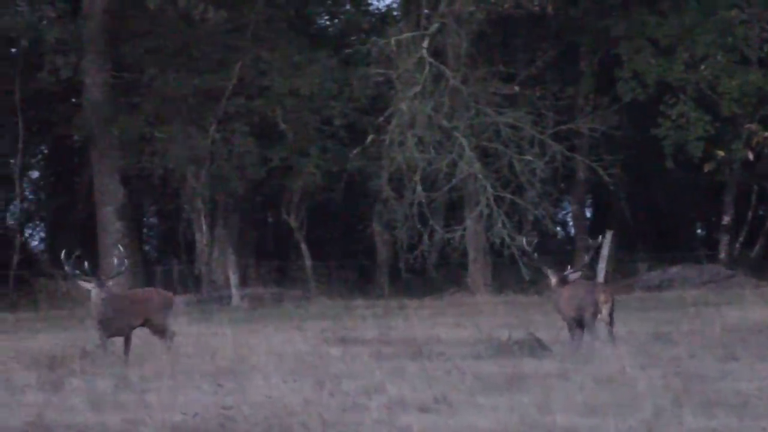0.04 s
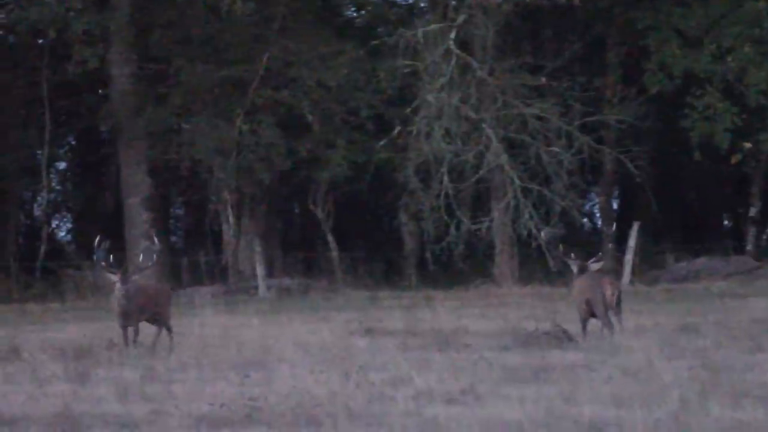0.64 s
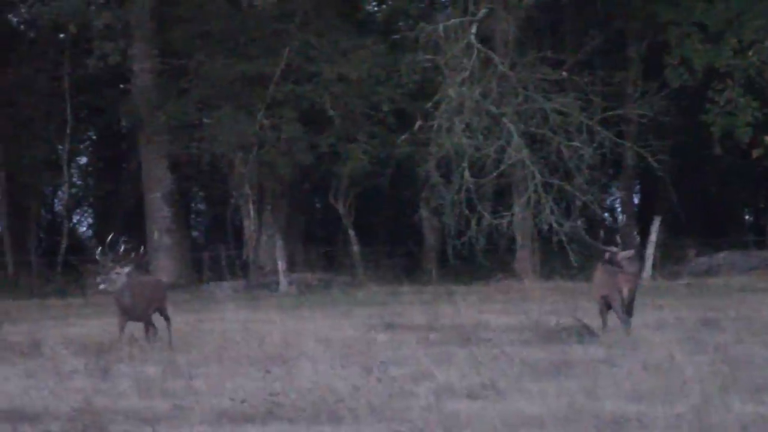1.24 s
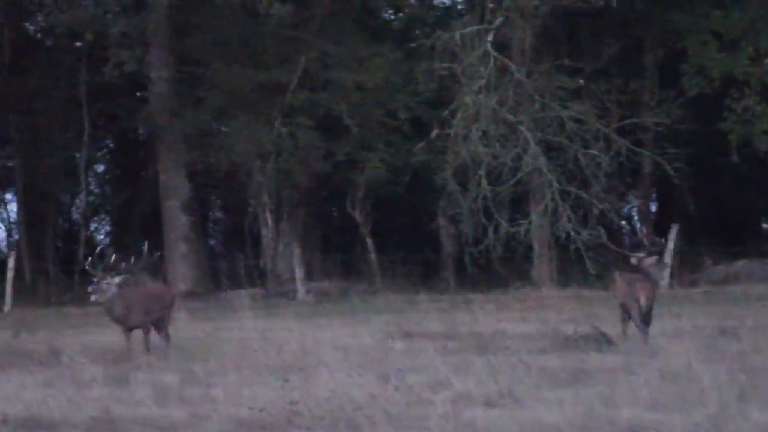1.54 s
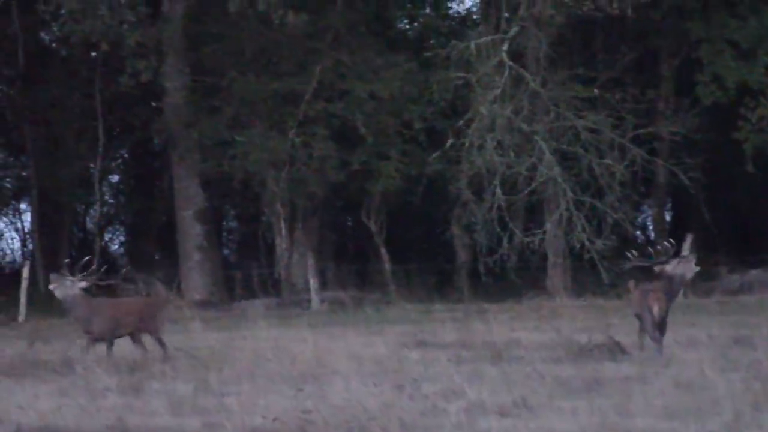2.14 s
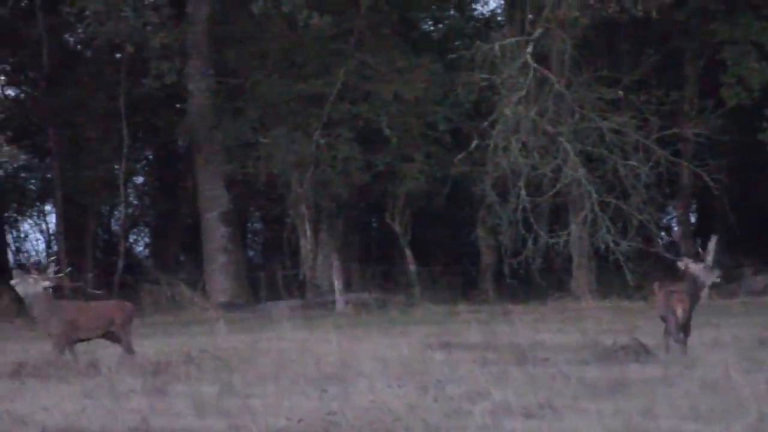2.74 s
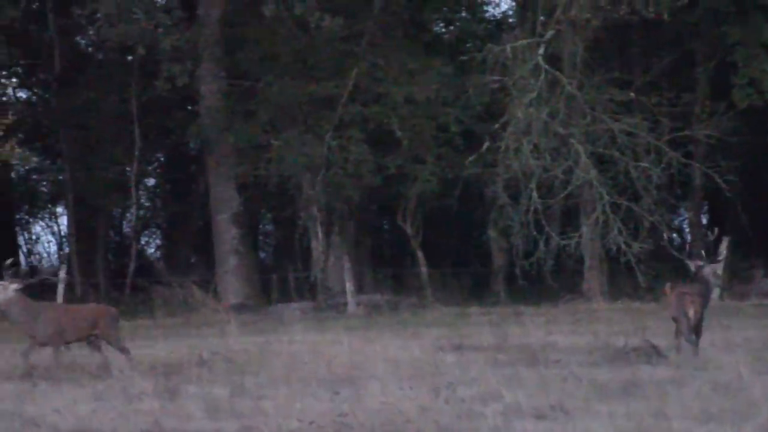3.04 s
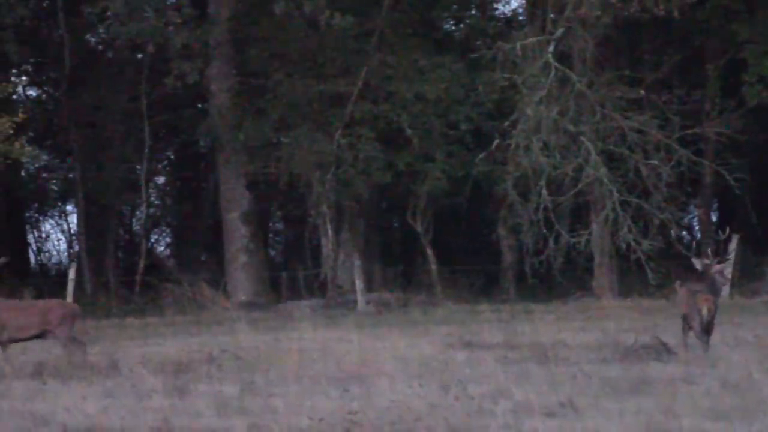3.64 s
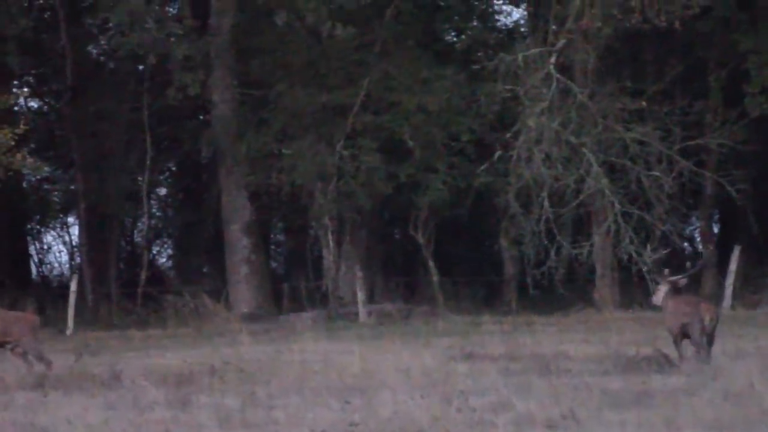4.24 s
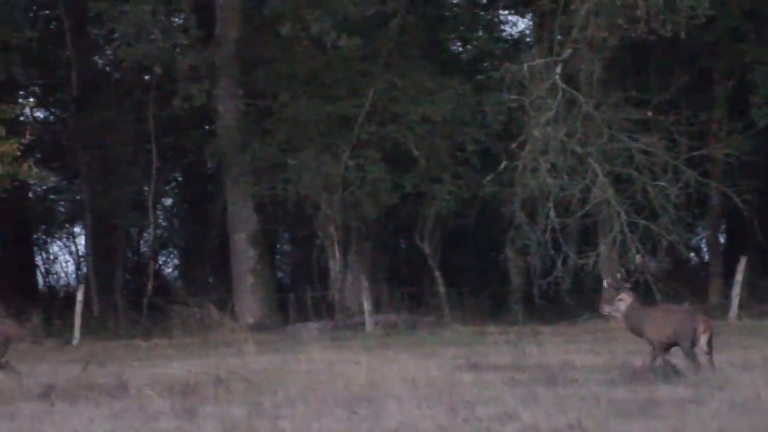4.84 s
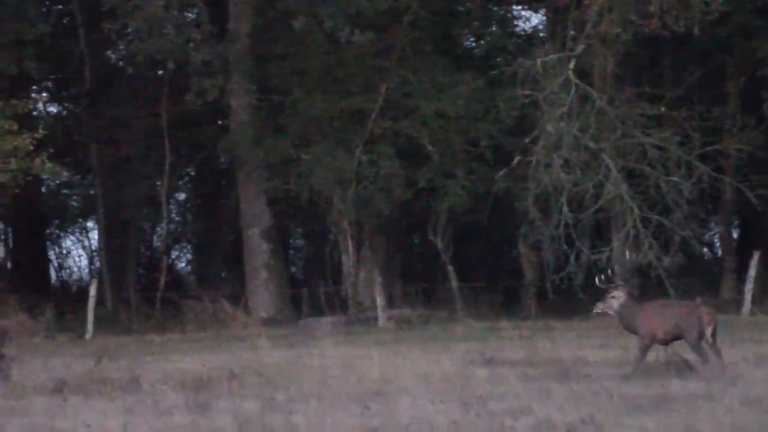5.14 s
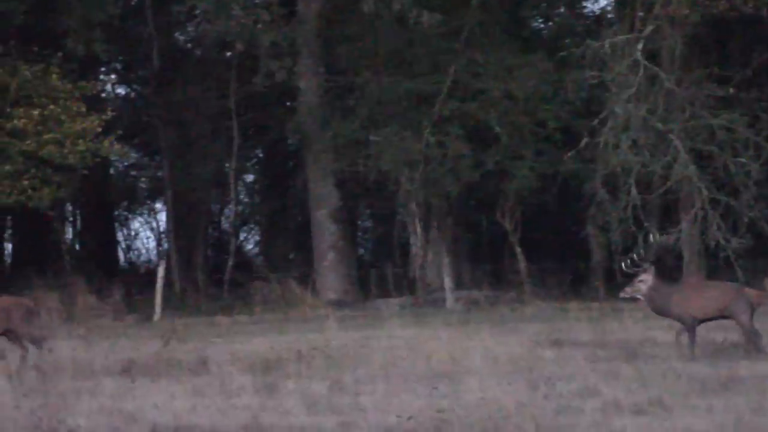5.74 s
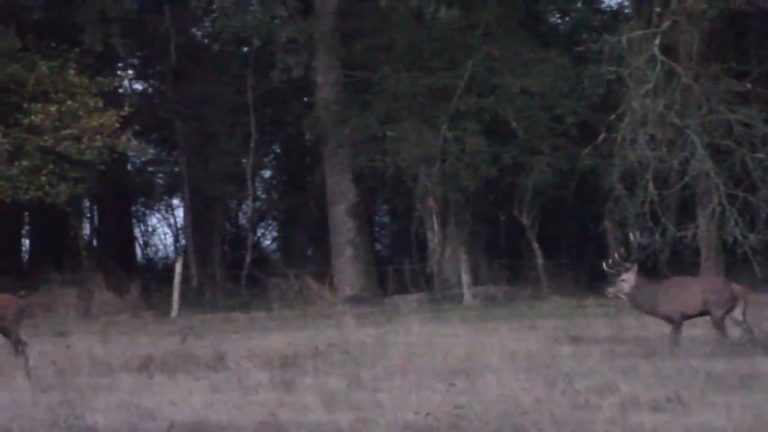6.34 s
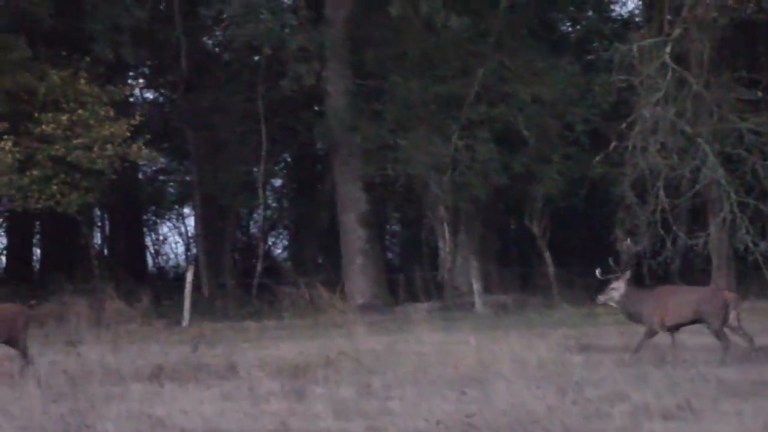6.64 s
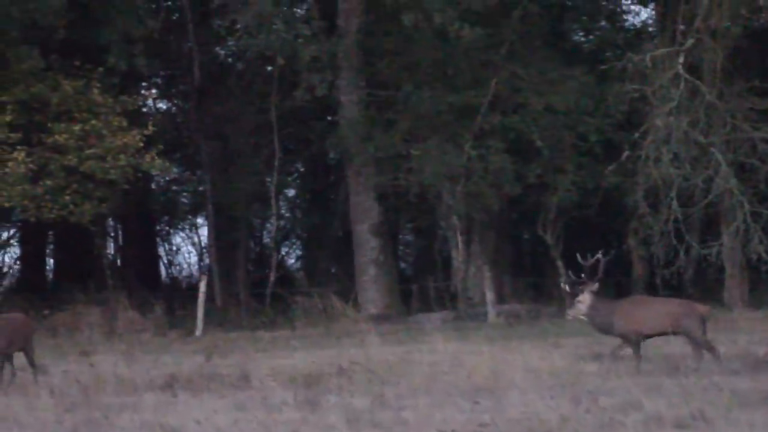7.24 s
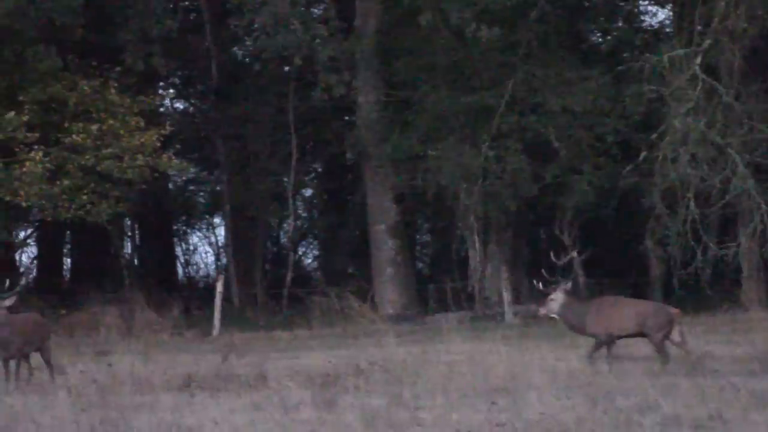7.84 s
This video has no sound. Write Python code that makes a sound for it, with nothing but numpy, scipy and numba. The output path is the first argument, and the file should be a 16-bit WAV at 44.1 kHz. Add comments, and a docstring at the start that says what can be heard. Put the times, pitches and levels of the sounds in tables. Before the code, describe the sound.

A red deer stag gives two harsh, low roars that ring through a forest clearing, while small birds whistle and twitter.

```python
"""A forest clearing at dusk. Over a hush, the faint tail of an earlier roar rings in the trees among
distant groans, and a small bird twitters. Nearer birds whistle, then a red deer stag roars twice: harsh,
irregular pulses through a throat whose resonances sink as the larynx is pulled down. The forest edge
rings long after him. Thin, high bird calls cross the second roar; as it dies away come sharp ticks,
more twittering and a few last distant groans."""
import sys
import numpy as np
from scipy import signal
from scipy.fft import rfft, irfft
from scipy.io import wavfile
from scipy.ndimage import uniform_filter1d
from numba import njit

SR = 44100
rng = np.random.default_rng(int(sys.argv[2]) if len(sys.argv) > 2 else 0)


def to_wav(sig):
    """Store sig (one row per channel, or 1-D mono) as 16-bit WAV at the path in sys.argv[1].

    Samples outside -1..1 are clipped; the rate is SR.
    """
    pcm = np.clip(np.atleast_2d(sig), -1, 1) * 32767
    pcm = np.round(pcm).astype(np.int16)
    wavfile.write(sys.argv[1], SR, pcm.T)  # frames by channels


N = 347508
TIME = np.arange(N) / SR


def from_db(db):
    """Decibels to gain."""
    return 10 ** (np.asarray(db) / 20)


def rms_one(x):
    """Scale to rms 1."""
    return x / np.sqrt(np.mean(x ** 2) + 1e-20)


def at_hz(points, hz):
    """Read a curve on a log-frequency axis."""
    knots_hz, values = np.array(points).T
    return np.interp(np.log(hz + 1), np.log(knots_hz), values)


def butter(x, hz, kind, order=2):
    """Butterworth filter."""
    return signal.sosfilt(signal.butter(order, hz, kind, fs=SR, output="sos"), x)


def drift(per_s, size):
    """Random wander with a spread of about 1."""
    knots = rng.standard_normal(4096)
    return np.interp(np.arange(size) / SR * per_s, np.arange(len(knots)), knots)


def pan(x, left_db):
    """Place a sound by how much louder it is on the left."""
    return x * from_db([[left_db / 2], [-left_db / 2]])


def stereo_noise(alike, size):
    """Two white noises with a given correlation."""
    mid, side = rng.standard_normal((2, size))
    return np.sqrt((1 + alike) / 2) * mid + np.sqrt((1 - alike) / 2) * side * [[1], [-1]]


def add(track, start, sound):
    """Mix a sound into a track at a time in seconds, trimming any overhang."""
    i = round(start * SR)
    part = sound[max(0, -i):max(0, N - i)]
    track[max(0, i):max(0, i) + len(part)] += part


def forest(x, trunks_db, tail_db, trunks_t60, alike):
    """Direct sound, quick scatter from nearby trunks and a long, uneven tail that loses treble first."""
    # How long the forest rings. Each row: frequency in Hz, seconds to fall by 60 dB.
    ring_times = [(300, 5.23), (500, 4.78), (760, 2.57), (1100, 3.14), (1400, 2.76), (1900, 2.03),
                  (3000, 1.51), (5000, 1.05), (8000, 1.22)]
    t = TIME[:3 * SR]
    edges_hz = 200 * 2 ** (np.arange(19) / 3)   # third octaves
    white, tail = stereo_noise(alike, len(t)), 0
    for low, high in zip(edges_hz, edges_hz[1:]):
        decay_db = 60 * t / at_hz(ring_times, np.sqrt(low * high))
        ripple_db = 2.0 * drift(12.12, len(t))
        tail = tail + butter(white, [low, high], "band") * from_db(ripple_db - decay_db)
    tail = tail * (1 - np.exp(-t / 0.0046))
    trunks = stereo_noise(alike, len(t)) * from_db(-60 * t / trunks_t60) * (t > .003)
    echo = (from_db(tail_db) * rms_one(tail) + from_db(trunks_db) * rms_one(trunks)) / np.sqrt(len(t))
    return x + signal.fftconvolve(x[None], echo, axes=1)[:, :N]


def hush():
    """The bed: far air in the trees and a thin, even hiss."""
    # Tone of the air. Each row: frequency in Hz, relative level in dB.
    spectrum = [(12, -61.5), (25, -15.5), (100, -5.5), (180, -3), (300, -4), (450, -2), (700, -9),
                (1150, -8), (1600, -11), (4300, -14.5), (15500, -16.5)]
    # Its width. Each row: frequency in Hz, left-right correlation.
    likeness = [(60, 0.3), (500, 0.34), (2000, 0.038), (8000, 0.013)]
    # Its lean. Each row: frequency in Hz, left over right in dB.
    balance = [(60, 1.5), (500, 2), (3000, -1), (12000, -.5)]
    hz = np.arange(N // 2 + 1) * SR / N
    mid, side = rfft(rng.standard_normal((2, N)))
    alike, sides = at_hz(likeness, hz), np.array([[1], [-1]])
    white = np.sqrt(1 + alike) * mid + np.sqrt(1 - alike) * side * sides
    colour = from_db(at_hz(spectrum, hz) + sides * at_hz(balance, hz) / 2)
    air = rms_one(irfft(colour * white, N))
    swell = from_db(2.0 * drift(13, N)) - 1   # the low air comes and goes
    return from_db(-52.5) * (air + swell * butter(air, 430, "low", order=1))


def vocal_folds(size, pitch_hz, jitter, shimmer_db, rasp):
    """Slack folds slap shut at uneven times and strengths; air rasps through at every opening."""
    cycles = np.cumsum(pitch_hz * np.exp(jitter * drift(90, size))) / SR
    slaps = np.diff(np.floor(cycles), prepend=0) * from_db(shimmer_db * drift(120, size))
    air = rng.standard_normal(size) * np.exp(-2.5 * (cycles % 1))
    return rms_one(slaps) + rasp * rms_one(air)


def murmur(per_s=7.4, length_s=0.66, low_hz=338, high_hz=685, level_db=-71):
    """Cues for faint groans at random times and resonances, dense enough to merge."""
    draws = rng.random((int(per_s * N / SR), 2))
    return [(when * N / SR, length_s, low_hz * (high_hz / low_hz) ** height, level_db)
            for when, height in draws]


def roar_tail_and_groans():
    """An earlier roar's faint tail among distant groans, to the left: each swell is one resonance."""
    # Each row: start in seconds, length in seconds, resonance in Hz, relative level in dB.
    # The opening rows above 1000 Hz are the roar's tail; the others are groans.
    swells = [(-.05, 0.31, 1330, -60), (0.197, 0.13, 343, -58.5), (0.349, 0.22, 620, -59),
              (0.498, 0.19, 1176, -57.5), (0.682, 0.28, 1095, -65), (0.899, 0.59, 630, -63),
              (1.756, 0.088, 503, -51.5), (1.959, 0.11, 459, -50), (7.15, 0.077, 430, -53),
              (7.33, 0.11, 487, -53), (7.523, 0.21, 467, -51)]
    half_width_hz = 64
    out = np.zeros(N)
    for start, length, hz, level_db in swells + murmur():
        size = int(length * SR)
        folds = vocal_folds(size, pitch_hz=121.2, jitter=0.25, shimmer_db=7, rasp=0.7)
        band = rms_one(butter(folds, [hz - half_width_hz, hz + half_width_hz], "band"))
        add(out, start, from_db(level_db) * np.hanning(size) * band)
    return pan(forest(out, trunks_db=-1.0, tail_db=-9.0, trunks_t60=0.12, alike=0.14), 9.2)


def syrinx(pitch, level_db, edge, waver, wavers_per_s=295):
    """A bird's unsteady, near-sine note along a pitch line; edge is the share spent fading."""
    size = len(pitch)
    phase = 2 * np.pi * np.cumsum(pitch * (1 + waver * drift(wavers_per_s, size))) / SR
    return np.sqrt(2) * from_db(level_db) * signal.windows.tukey(size, edge) * np.sin(phase)


def chirp(length, first_hz, last_hz, level_db):
    """A quick, buzzy, arched sweep; the other side of the syrinx adds a softer, lower note."""
    arch, buzz_depth, buzz_hz = 0.021, 0.036, 105.5
    size = int(length * SR)
    pitch = np.linspace(first_hz, last_hz, size) * (1 + arch * (1 - np.linspace(-1, 1, size) ** 2))
    buzz = 1 + buzz_depth * np.sin(2 * np.pi * (buzz_hz * TIME[:size] + rng.random()))
    upper = syrinx(pitch * buzz, level_db, edge=0.38, waver=0.021)
    lower = syrinx(pitch.mean() * .87 * buzz[::-1], level_db - 12.5, edge=0.3, waver=0.027)
    return upper + lower


def twitterer():
    """Two hurried phrases of chirps from the trees on the right."""
    # Each row: start in seconds, length in seconds, first and last pitch in Hz, relative level in dB.
    chirps = [(0.0, 0.013, 3060, 3670, -41), (0.05, 0.034, 3350, 4330, -40),
              (0.126, 0.017, 3610, 3770, -38.5), (0.173, 0.0085, 3370, 4380, -39),
              (0.183, 0.021, 3570, 3490, -41.5), (0.25, 0.026, 3530, 4330, -40),
              (0.316, 0.017, 3136, 3900, -39.5), (0.361, .016, 3890, 3490, -37.5),
              (0.376, 0.015, 3386, 4115, -36.5), (0.446, 0.021, 3480, 4070, -37.5),
              (0.509, 0.027, 3450, 3190, -43.5), (0.56, 0.035, 2990, 3700, -41.5),
              (0.643, 0.041, 3550, 3820, -41.5), (0.72, 0.026, 3090, 3360, -48),
              (0.765, 0.042, 3600, 3575, -49.5), (5.924, 0.01, 3840, 3920, -40.5),
              (5.943, 0.021, 3790, 3940, -39), (5.972, 0.027, 4010, 3640, -33),
              (6.016, 0.017, 3930, 3520, -41), (6.034, 0.029, 3750, 3660, -33.5),
              (6.07, 0.018, 3696, 3630, -37), (6.099, 0.0086, 3920, 3590, -33),
              (6.115, 0.014, 3780, 3420, -34.5), (6.13, 0.036, 3710, 3280, -41),
              (6.26, 0.039, 3625, 3780, -37.5), (6.374, 0.042, 3940, 3340, -39),
              (6.459, 0.027, 3700, 3700, -41), (6.537, 0.029, 3647, 3485, -43)]
    out = np.zeros(N)
    for start, *note in chirps:
        add(out, start, chirp(*note))
    in_trees = forest(out, trunks_db=-2.0, tail_db=-11.5, trunks_t60=0.59, alike=.37)
    return from_db(-2.03) * pan(in_trees, -5.5)


def whistles():
    """Pure songbird notes that swoop down onto a pitch, then slide while they swell or fade."""
    # Each row: start in seconds, length in seconds, first pitch in Hz, swoop time in seconds,
    # settled pitch in Hz, slide in Hz per second, relative level in dB, swell over the note in dB.
    notes = [(1.188, 0.08, 6140, 0.015, 5600, 1100, -23, 5),
             (1.384, 0.1086, 6450, 0.01, 6204, -2800, -18, 8.5),
             (1.625, 0.21, 7000, 0.017, 6150, -200, -20, 0), (1.855, 0.057, 6227, 0.019, 5870, 14, -21, 3),
             (1.99, 0.058, 7490, 0.0062, 5710, 89, -19.5, -3.5),
             (2.098, 0.11, 7640, 0.011, 4974, 1097, -16.5, 4.5)]
    out = np.zeros(N)
    for start, length, first_hz, swoop, settled_hz, slide, level_db, swell_db in notes:
        t = TIME[:int(length * SR)]
        pitch = settled_hz + (first_hz - settled_hz) * np.exp(-t / swoop) + slide * t
        pitch = pitch * (1 + 0.0076 * drift(55, len(t)))   # the held pitch strays a little
        add(out, start, syrinx(pitch, level_db + swell_db * (t / length - .5), edge=0.11, waver=0.0081))
    return out


def hoarse_notes():
    """Lower, rougher bird notes that glide down towards a pitch."""
    # Each row: start in seconds, length in seconds, first and target pitch in Hz,
    # glide time in seconds, relative level in dB, roughness as a share of the pitch.
    notes = [(1.213, 0.028, 6170, 4570, 0.018, -32, 0.042), (1.405, 0.026, 5500, 4420, 0.02, -45.5, 0.067),
             (2.286, 0.2, 3048, 2994, 0.02, -23.5, 0.015), (4.937, 0.037, 5440, 3856, 0.0088, -29, 0.02),
             (4.995, 0.044, 3380, 2990, 0.021, -37.5, 0.018), (5.11, 0.073, 3875, 3750, 0.044, -39, 0.013),
             (5.17, 0.091, 3470, 3200, 0.043, -35, 0.022), (6.477, 0.0038, 3100, 1730, 0.0018, -36.5, .015)]
    out = np.zeros(N)
    for start, length, first_hz, target_hz, glide, level_db, rough in notes:
        t = TIME[:int(length * SR)]
        pitch = target_hz + (first_hz - target_hz) * np.exp(-t / glide)
        add(out, start, syrinx(pitch, level_db, edge=0.086, waver=rough, wavers_per_s=600))
    return out


def near_birds():
    """Whistles, hoarse notes, thin calls and ticks from the trees on the left."""
    song = forest(whistles(), trunks_db=-3.0, tail_db=-22.5, trunks_t60=0.6, alike=0.46)
    contact = forest(ticks(), trunks_db=-0.5, tail_db=-19.0, trunks_t60=0.38, alike=0.32)
    calls = hoarse_notes() + thin_calls()
    deeper = forest(calls, trunks_db=0.5, tail_db=-18.5, trunks_t60=0.64, alike=0.1)
    return pan(from_db(-6.0) * song + contact, 4.5) + from_db(-5.5) * pan(deeper, 5.0)


def roar_gesture(pull, hold, tiring, full_db, resting, abruptness, flare_db):
    """Pull, hold, tire, let go: one roar's effort, throat shortness, brightness and tiredness (0-1)."""
    swell_db, sag_db, release_db_per_s = 21, 6.5, 175
    flare_at, flare_width = 0.49, 0.36   # shares of the pull
    end = pull + hold + tiring
    t = TIME[:int((end + 40 / release_db_per_s) * SR)]
    to_go = np.maximum(1 - t / pull, 0)   # the larynx drops fast, then eases onto its stop
    tired = np.clip((t - pull - hold) / tiring, 0, 1)
    creep = 0.028 * (pull + hold - t)   # the throat keeps stretching a little
    wobble = (0.0072 + 0.035 * tired ** 2) * drift(7.98, len(t))   # and shakes more as he tires
    shortness = 1 + (resting - 1) * to_go ** 1.64 + creep + wobble
    release_db = release_db_per_s * np.maximum(t - end, 0)
    effort_db = full_db - swell_db * to_go ** abruptness - sag_db * tired - release_db
    bright_db = flare_db * np.exp(-((t / pull - flare_at) / flare_width) ** 2)
    return effort_db, shortness, bright_db, tired


@njit
def resonance(x, hz, width):
    """A resonance with moving centre and width, and a peak gain of about 1."""
    out, state = np.zeros(len(x)), 0j
    for i in range(len(x)):
        decay = np.exp(-np.pi * width[i] / SR)
        state = state * decay * np.exp(2j * np.pi * hz[i] / SR) + x[i]
        out[i] = 2 * (1 - decay) * state.real
    return out


def roar(effort_db, shortness, bright_db, tired, rasp_db):
    """The stag lowers his larynx while he calls: the throat lengthens and its resonances slide down."""
    # Resonances of the stretched throat. Each row: centre in Hz, width in Hz, relative level in dB,
    # how strongly it follows the larynx, how strongly it takes up the brightness.
    throat = [(399, 21.5, -7, 0.91, 0.5), (485.6, 54, -3.5, 0.77, 0.58), (697, 73, -12.5, 0.72, 0.64),
              (762.4, 21.4, 2.6, 1, 0.53), (1070.6, 68.5, 4, 0.42, 0.15), (1124, 28.3, -1, 0.69, 0.5),
              (1342, 22.3, 3, 0.734, 0.032), (1528, 7.5, -17.5, 0.874, 1.46),
              (1767, 27, -16.5, 0.557, 1.59), (1868, 45, -22.5, 0.88, 1.5), (2026, 15, -15, 0.26, 0.75),
              (2196, 26, -11.5, 0.59, 1.15), (2520, 85, -18.5, 0.39, 1.1), (2720, 170, -23.5, 0.47, 0.77),
              (3476, 58, -17, 0.098, 1.24), (4020, 58, -28.5, .1, 0.058)]
    attack_s, blur_hz = 0.099, 22
    t = TIME[:len(effort_db)]
    folds = vocal_folds(len(t), pitch_hz=80.07, jitter=.35, shimmer_db=1.5, rasp=1.12)
    slack, voice = np.maximum(shortness - 1, 0), 0
    for hz, width, level_db, follows, lift in throat:
        flutter = (0.0075 + 0.026 * slack) * drift(30, len(t))
        centre = hz * shortness ** follows * (1 + flutter)
        damping = width + blur_hz * slack   # a slack throat rings less sharply
        closed_db = -22 * slack * abs(np.log2(hz / 1100))   # a half-closed mouth favours the mids
        ringing = resonance(resonance(folds, centre, damping), centre, damping * 4.5)
        voice = voice + from_db(level_db + closed_db + lift * bright_db) * ringing
    # Raw slaps and hiss fill the valleys; a high rasp joins once the throat is wide open.
    slaps = from_db(-21.5 + 15 * tired) * butter(folds, [400, 1350], "band", order=6)
    hiss = from_db(-40.5 + bright_db) * butter(folds, [1700, 3600], "band", order=6)
    rasp = from_db(rasp_db - 70 * slack) * (1 - tired) * butter(folds, [3700, 4650], "band", order=6)
    voice = butter(voice + (slaps + hiss) / shortness ** 2 + rasp, 321, "high", order=4)
    levelled = voice / np.sqrt(uniform_filter1d(voice ** 2, size=SR // 14) + 1e-12)
    return np.minimum(t / attack_s, 1) * from_db(effort_db) * levelled


def stag():
    """Two roars across the clearing, heard mostly by way of the trees."""
    # Each row: start, larynx pull, hold and tiring time in seconds, relative effort in dB, throat
    # shortness at rest (1 is stretched), abruptness of the swell, treble flare in dB, high rasp in dB.
    roars = [(2.08, 0.52, 0.52, 0.43, -25, 1.66, 1.7, 21.5, -41.5),
             (4.3, 0.639, 0.49, 0.24, -23, 1.506, 1.18, 13.5, -34)]
    out = np.zeros(N)
    for start, *gesture, rasp_db in roars:
        add(out, start, roar(*roar_gesture(*gesture), rasp_db))
    in_trees = forest(out, trunks_db=-1.0, tail_db=-3.0, trunks_t60=0.48, alike=0.72)
    return from_db(-5.5) * pan(in_trees, 1.56)


def thin_calls():
    """Wavering high notes from the canopy, each on a shallow arch of pitch."""
    # Each row: start in seconds, length in seconds, top pitch in Hz, relative level in dB.
    calls = [(4.38, 0.12, 8170, -55), (4.48, 0.14, 7930, -47.5), (4.667, 0.21, 8170, -48.5),
             (5.59, 0.15, 8000, -54.5), (7.168, 0.045, 6300, -48)]
    out = np.zeros(N)
    for start, length, top_hz, level_db in calls:
        arch = 1 - 0.066 * np.linspace(-1, 1, int(length * SR)) ** 2
        add(out, start, syrinx(top_hz * arch, level_db, edge=0.44, waver=0.0358))
    return out


def ticks():
    """A bird's sharp contact ticks, each the same very short upward flick."""
    # Each row: start in seconds, relative level in dB.
    cues = [(5.769, -29), (7.278, -27), (7.575, -31.5)]
    flick_hz = np.linspace(4780, 8170, int(0.0068 * SR))
    out = np.zeros(N)
    for start, level_db in cues:
        add(out, start, syrinx(flick_hz, level_db, edge=1.0, waver=0.00082))
    return out


def scene():
    """The stag out front, with far voices, birds and the hush around him."""
    return stag() + roar_tail_and_groans() + near_birds() + twitterer() + hush()


def record(dry):
    """A steep low-pass takes off the very top."""
    cutoff_hz = 15900
    return signal.sosfilt(signal.ellip(12, .1, 80, cutoff_hz, fs=SR, output="sos"), dry)


dry = scene()
out = record(dry)
to_wav(out)
```